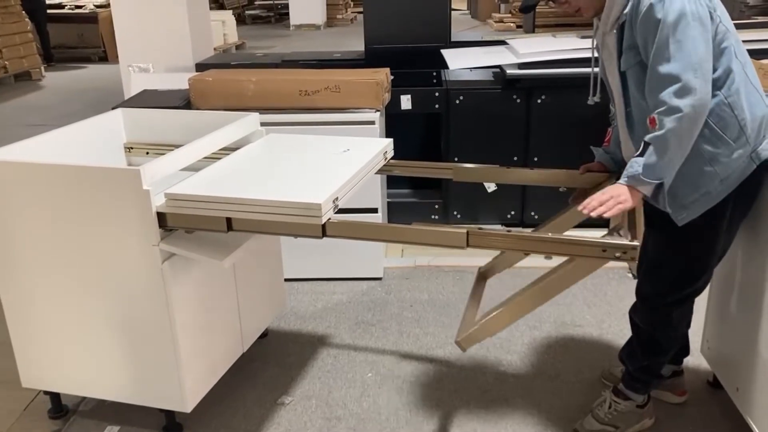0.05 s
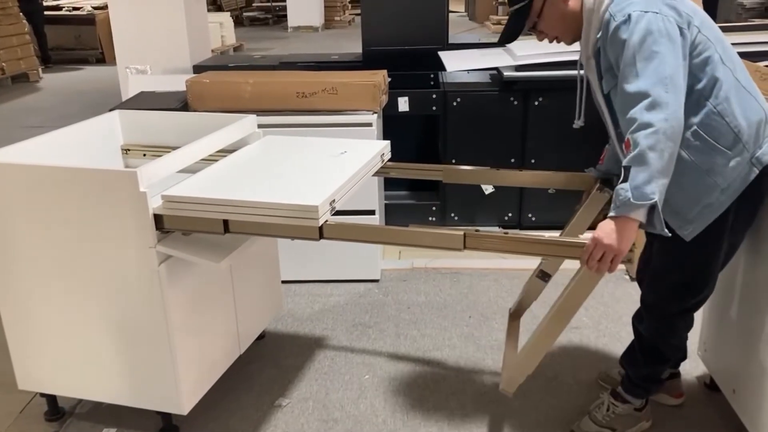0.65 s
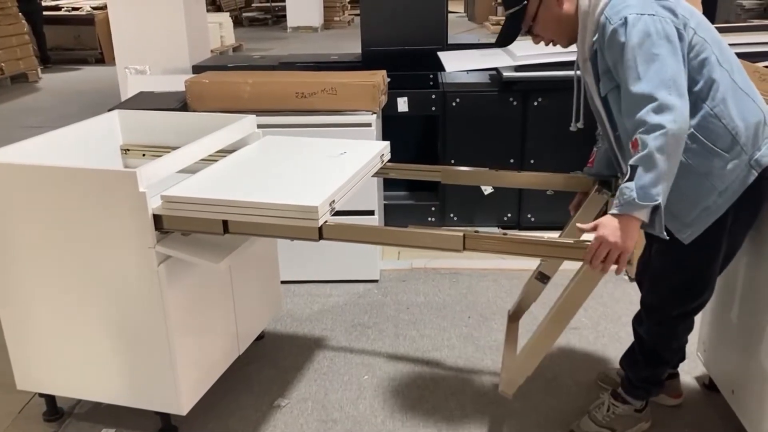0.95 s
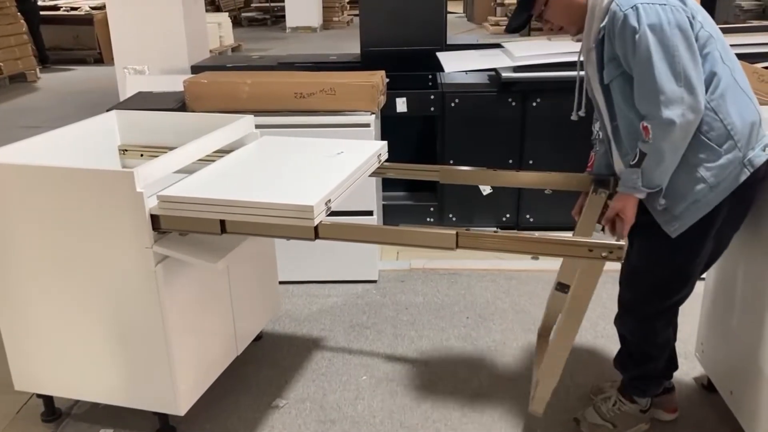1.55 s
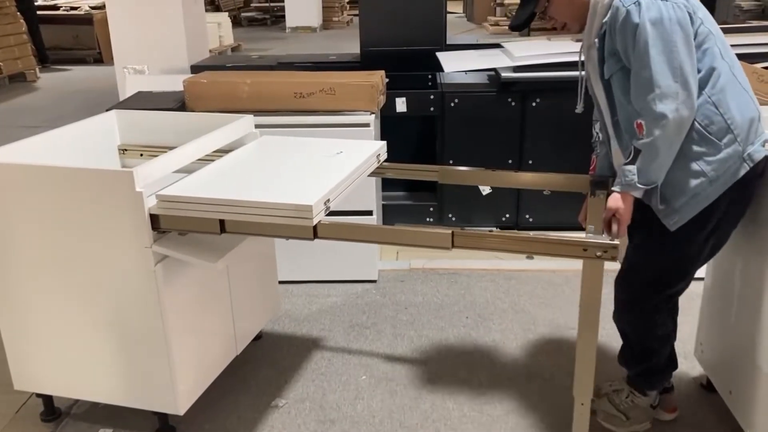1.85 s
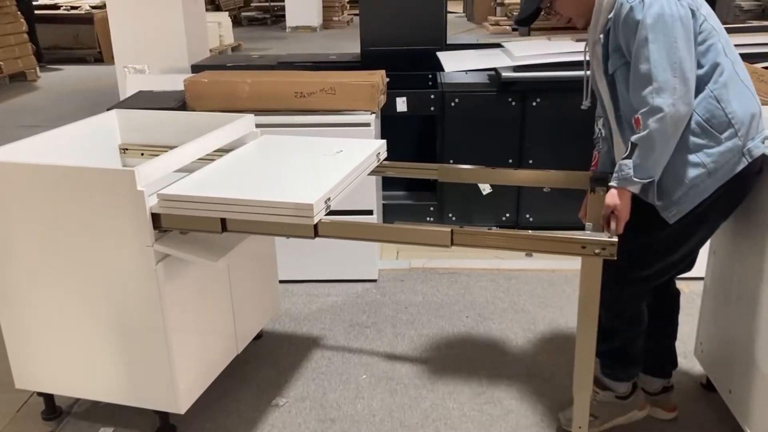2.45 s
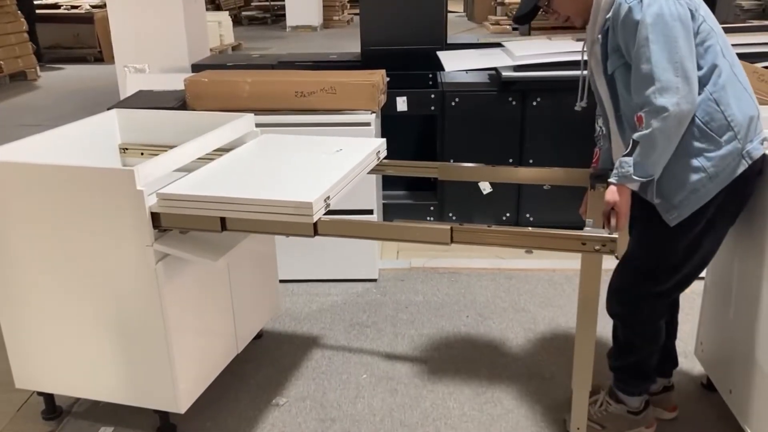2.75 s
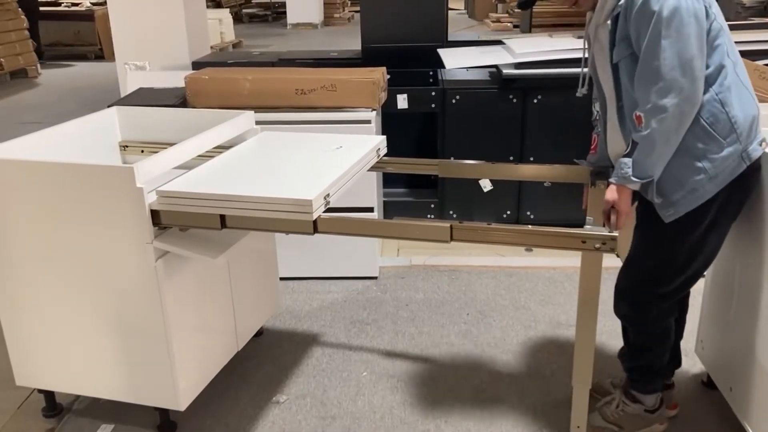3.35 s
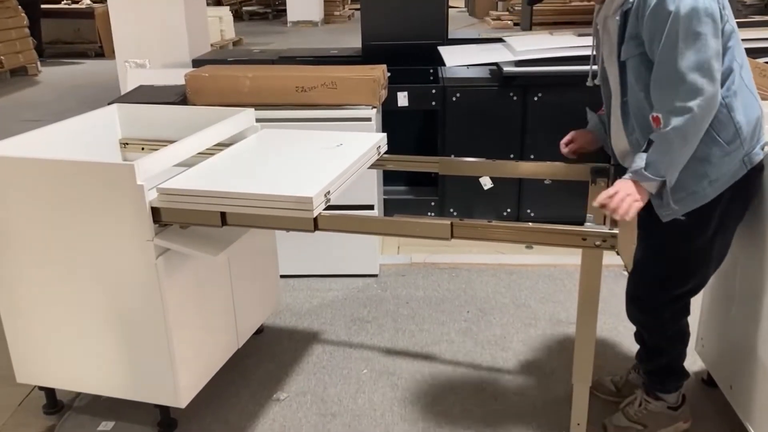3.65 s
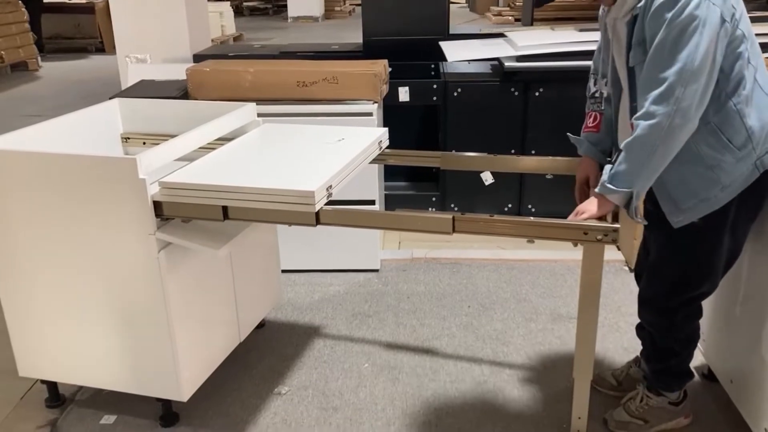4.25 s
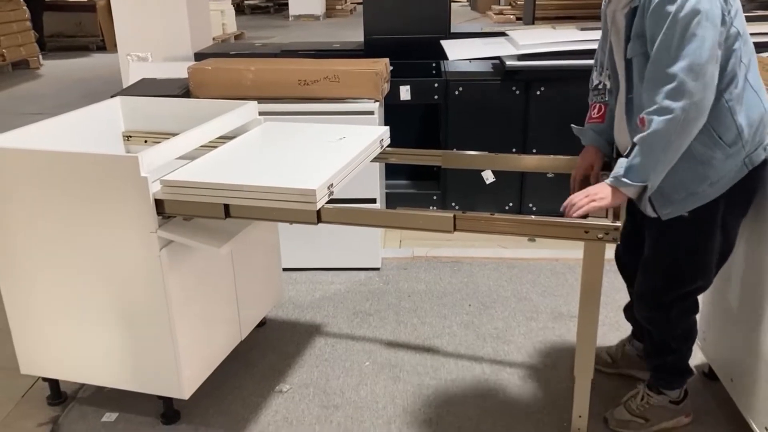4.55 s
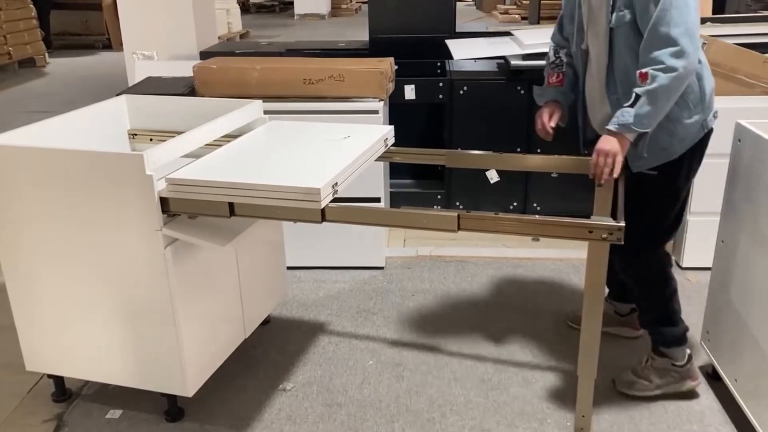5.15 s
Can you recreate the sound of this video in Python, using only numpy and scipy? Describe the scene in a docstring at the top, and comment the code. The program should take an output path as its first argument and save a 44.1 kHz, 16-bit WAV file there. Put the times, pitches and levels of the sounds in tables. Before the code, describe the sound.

A metal leg frame grinds and squeaks on stiff hinges, clacks home, then two latches snap shut in a large echoing room.

```python
"""Stiff hinges grind twice as a steel leg frame swings down from the rails of a pull-out table.
Stick-slip friction rasps, rings the tubes and booms the frame; the dry pivot squeals.
The leg clacks home, then two sprung latches snap shut and shake the rails.
Behind: ticks, bumps, a rustling jacket, warehouse ventilation and echo. A limiter ducks loud snaps."""
import sys
import numpy as np
from scipy import signal
from scipy.fft import rfft, irfft
from scipy.io import wavfile
from scipy.ndimage import uniform_filter1d, minimum_filter1d

SR = 44100
rng = np.random.default_rng(int(sys.argv[2]) if len(sys.argv) > 2 else 0)


def unload_wav(signal):
    """Save mono or channel-first audio to the path in sys.argv[1] as 16-bit WAV at rate SR, clipped to [-1, 1]."""
    wavfile.write(
        sys.argv[1],
        SR,
        np.round(np.clip(np.atleast_2d(signal).T, -1, 1) * 32767).astype(np.int16),
    )


N = 238316
TIME, FREQS = np.arange(N) / SR, np.fft.rfftfreq(N, 1 / SR)

# pushes on the hinge: t/s, level/dB, rise/s, fade/(dB/s), treble lift/dB, tube ring/dB
PUSHES = [(.888, -23, 0.019, 108, 0, -7), (1.632, -32, 0.015, 96, 1.5, 1),
          (1.66, -23.5, 0.046, 119, -17, -5.5), (1.83, -37.5, 0.023, 130, 9, -2),
          (2.04, -54, 0.02, 156, -6, 2)]
# latch contacts, one latch per rail: t/s, ring/dB, crack/dB
FIRST_CONTACTS = [(2.8033, -21, -7), (2.805, -1, -22), (2.8076, -5, -17), (2.81, -20, -12),
                  (2.8258, -14, -8.5), (2.829, -11.5, -15), (2.835, -37, -11.5)]
SECOND_CONTACTS = [(4.0262, -35, -21), (4.0303, -6.5, -27), (4.0331, -7, -3), (4.0358, -22, -9.5),
                   (4.045, -37, -14), (4.0498, -44, -21)]


def hinge(slips_per_s, grain_db, judder_db, waver, chatter_db, upright_after_s):
    """Dense stick-slip clicks rasp in the joint and pump the tube modes."""
    # rasp spectra, leg half down and nearly upright: f/Hz, level/dB
    half_down_rasp = [(200, -21), (700, -5), (1100, 0), (1500, -1), (2200, 0.5), (2600, -5.5), (3300, 0),
                      (3750, -8), (4400, -8), (5400, -11), (8000, -9.5), (10500, -15), (15500, -32)]
    upright_rasp = [(200, -8), (600, 0.5), (950, 3), (1250, -2), (1900, 3.5), (2500, -3), (3400, -3),
                    (3700, -5), (4200, -7), (4600, -16), (5700, -18), (7200, -11.5), (10500, -28),
                    (15500, -43)]
    # leg tubes: f/Hz, t60/s, half-down level/dB, upright level/dB
    tube_modes = [(1100, .33, -18, 1), (1147, .35, -20, -6), (1295, .35, -4, -9), (1341, .42, 0, 5),
                  (1365, .45, 0, -5), (1482, .4, -13, -8), (1551, .35, -15, -14), (1925, .35, -18, -14),
                  (2035, .4, -10, -14), (2140, .4, -10, -4), (2645, .4, -18, -12), (2800, .35, -10, -9),
                  (3205, .22, -3, -6), (3350, .4, -13, -10), (4050, .18, -11, -9), (4098, .22, -3, -11),
                  (4925, .2, -5, -13), (5340, .35, -15, -26), (6780, .3, -12, -24), (7005, .4, -9, -23),
                  (7510, .22, -10, -25), (7750, .18, -13, -26), (8220, .2, -17, -31)]
    out, t = np.zeros((2, N)), TIME[:SR]
    # weak rail and bracket modes: metallic grain
    crowd = sum(ring(hz, .12, t[:SR // 4], 2 * np.pi) for hz in rng.uniform(200, 15500, size=260))
    for start_s, level_db, rise_s, fade_db_per_s, lift_db, ring_db in PUSHES:
        upright = start_s > upright_after_s
        sizes = amp(grain_db * np.minimum(rng.exponential(1, (2, SR)), 3))
        sizes *= rng.choice([-1, 1], (2, SR))
        slips = evened(sizes * (rng.random((2, SR)) < slips_per_s / SR))
        envelope_db = level_db - fade_db_per_s * np.maximum(t - rise_s, 0) + judder_db * wander(70)
        slips *= np.minimum(t / rise_s, 1) * amp(envelope_db)
        tubes = np.zeros((2, SR))
        load = wander(48)  # changing joint load: each mode wavers and chatters
        for hz, t60_s, half_down_db, upright_db in tube_modes:
            pitch_hz = hz * (1 + waver * np.roll(load, rng.integers(SR)))
            carrier = np.exp(2j * np.pi * np.cumsum(pitch_hz) / SR)
            mode = carrier * signal.lfilter([1], [1, -amp(-60 / (t60_s * SR))], slips / carrier)
            chatter = amp(chatter_db * np.roll(load, rng.integers(SR)))
            tubes += amp(upright_db if upright else half_down_db) * evened(mode.real * chatter)
        dull = signal.lfilter(*signal.butter(1, 4000, fs=SR), slips)
        shelved = dull + (slips - dull) * amp(lift_db)
        grain = signal.fftconvolve(shelved, crowd / np.linalg.norm(crowd[0]), axes=1)[:, :SR]
        rasp = coloured(0.93 * shelved + 0.62 * grain, upright_rasp if upright else half_down_rasp)
        add(out, start_s, rasp + amp(ring_db) * np.std(slips) * tubes)
    return out


def pivot(roughness, waver, chirp_count, locked_s):
    """The dry pivot locks briefly onto one mode and squeals; faint random chirps until the leg locks."""
    # squeals: t/s, level/dB, length/s, f/Hz
    squeals = [(.778, -48, 0.03, 3850), (.909, -25, 0.026, 4138), (.915, -29, 0.045, 4930),
               (1.043, -34.5, .028, 4150), (1.443, -43, 0.032, 3840), (1.687, -28.5, 0.034, 4870),
               (1.69, -28.5, 0.059, 4075), (2.511, -46, 0.022, 3840), (2.783, -34, 0.036, 3940),
               (3.95, -49, 0.028, 3880)]
    chirps = [(locked_s * (k + rng.random()) / chirp_count, rng.normal(-52, 1.5), .03, 3865)
              for k in range(chirp_count)]
    out = np.zeros((2, N))
    for start_s, db, length_s, hz in squeals + chirps:
        size = round(length_s * SR)
        pitch_hz = hz * (1 + waver * wander(210)[:size])
        cycles = np.cumsum(pitch_hz) / SR + rng.uniform(0, 1 / 3, (2, 1))
        flutter = 1 + roughness * wander(150)[:size]
        add(out, start_s, amp(db) * np.hanning(size) * evened(flutter * np.sin(2 * np.pi * cycles)))
    return out


def clack():
    """The leg hits its stop and rattles to rest."""
    # impacts: t/s, level/dB, decay/s
    impacts = [(2.2126, -20.5, 0.0022), (2.2156, -13, 0.0038), (2.2223, -29, 0.0062), (2.232, -23, 0.013),
               (2.246, -43, 0.012)]
    # impact spectrum: f/Hz, level/dB
    colour = [(100, -37), (350, -4), (750, -4.5), (1200, -4), (1900, -1), (2400, -7), (4100, -3.5),
              (4900, -11.5), (6300, -14), (9200, -8.5), (12000, -14), (15500, -22)]
    out = np.zeros((2, N))
    for start_s, db, decay_s in impacts:
        add(out, start_s, amp(db) * crack(decay_s, colour))
    return out


def latch(contacts, modes, rise_s, low_cut_hz):
    """A sprung catch snaps in and bounces; each contact cracks and rings the bracket."""
    # crack spectrum: f/Hz, level/dB
    colour = [(150, -23), (500, -6), (1200, -0.5), (3000, 0), (5000, -2.5), (7300, -6), (8400, 7),
              (9500, 7.5), (11500, -2.5), (13500, -3), (15500, -12)]
    out, t = np.zeros((2, N)), TIME[:SR // 6]
    small_plate = signal.butter(3, low_cut_hz, "highpass", fs=SR, output="sos")  # radiates no bass
    attack = 1 - np.exp(-t / rise_s)
    for start_s, ring_db, crack_db in contacts:
        detune = rng.uniform(.975, 1.025, len(modes))  # each contact clamps differently
        body = sum(amp(db) * ring(hz * d, t60_s, t, 0.65) for (hz, db, t60_s), d in zip(modes, detune))
        add(out, start_s, amp(ring_db) * unit_hit(signal.sosfilt(small_plate, body * attack)))
        add(out, start_s, amp(crack_db) * crack(0.004, colour))
    return out


def latches():
    """Two catches shut in turn, each ringing its own bracket."""
    # bracket modes: f/Hz, level/dB, t60/s
    first_modes = [(1100, -8, 0.028), (2067, -4.5, 0.036), (2150, -14, 0.021), (2317, 3, 0.016),
                   (2420, 1.5, 0.021), (2760, -9.5, 0.03), (3030, -2, 0.018), (3315, -2, 0.02),
                   (3780, -13, 0.022), (4260, -17, 0.023)]
    second_modes = [(1070, -19, 0.024), (1400, -6, 0.013), (1970, -11, 0.016), (2140, 6, 0.018),
                    (2520, 0.5, 0.012), (2960, -10, .02), (3160, -4, .02), (4070, -4.5, .022),
                    (4220, -8, 0.024), (5000, -19, 0.016), (8000, -9, 0.018), (8650, 0, 0.023),
                    (10180, -2, 0.016)]
    first = latch(FIRST_CONTACTS, first_modes, rise_s=0.0012, low_cut_hz=1450)
    return first + latch(SECOND_CONTACTS, second_modes, rise_s=0.0002, low_cut_hz=930)


def rails():
    """Each latch contact shakes the crowded modes of a long rail."""
    # rail spectrum: f/Hz, level/dB
    colour = [(300, -25), (1650, -18.5), (2000, 1.5), (2500, -3), (3300, -1), (3800, -2.5), (4700, -8),
              (5400, -22), (8000, -11), (15500, -35)]
    out = np.zeros((2, N))
    for start_s, ring_db, _ in FIRST_CONTACTS + SECOND_CONTACTS:
        add(out, start_s, amp(ring_db) * crack(0.0045, colour))
    return out


def ticks():
    """Loose play clicks in the rails."""
    # clicks: t/s, level/dB, decay/s, treble lift/dB
    clicks = [(.31, -38, 0.0026, 1), (0.663, -43, 0.015, -8), (1.555, -35, 0.0086, 7.5),
              (2.577, -42.5, .004, -5), (3.351, -41.5, 0.0085, 4), (3.938, -39.5, .0066, -7),
              (3.968, -38.5, .015, -15), (4.6663, -30.5, 0.0028, 15), (4.674, -35.5, 0.0051, -13),
              (4.7176, -34, 0.0051, -2)]
    # click spectrum: f/Hz, level/dB
    colour = [(300, 1), (1500, -2), (2300, -0.5), (3300, 2.5), (4400, -1), (5600, -14.5), (8500, -8.5),
              (11000, -5.5), (15500, -44)]
    out = np.zeros((2, N))
    for start_s, db, decay_s, lift_db in clicks:
        add(out, start_s, amp(db) * crack(decay_s, colour, lift_db))
    return out


def low_sounds():
    """Dull knocks and scuffs, two brief swells of low background rumble, a frame boom under each push."""
    # low noise bursts: t/s, level/dB, centre/Hz, width/octaves, rise/s, decay/s
    bursts = [(.079, -32, 76, 1, 0.011, 0.087), (.4, -34, 195, 1, 0.046, .1),
              (.406, -34, 532, .2, .012, .05), (.658, -30.5, 365, 0.79, 0.006, 0.31),
              (.72, -41, 129, .5, 0.02, .2), (1.55, -34.5, 109, 0.67, 0.044, 0.22),
              (2.213, -27, 202, 0.87, 0.0094, .07), (3.659, -36.5, 75, 0.37, 0.014, .18),
              (4.02, -27, 264, 0.8, 0.0034, 0.22), (4.219, -33.5, 156, 0.46, 0.076, 0.16),
              (4.345, -29.5, 328, 1, 0.018, 0.1)]
    out = np.zeros((2, N))
    for start_s, db, *shape in bursts:
        add(out, start_s, amp(db) * burst(*shape))
    for start_s, db, *_ in PUSHES:
        add(out, start_s, amp(db - 12) * burst(centre_hz=215, octaves=1.16, rise_s=0.019, decay_s=0.45))
    return out


def jacket(held_db, resting_db, let_go_s, settle_s, grain_db):
    """Cloth rubs in small clumps: steadily while the frame is held, more with each arm move."""
    # arm moves: t/s, level/dB, decay/s
    swishes = [(.38, -45.5, 0.33), (.65, -38, 0.18), (1.53, -44, 0.2), (3.08, -47, 1), (3.9, -47, 0.36),
               (4.33, -48, 0.03)]
    # cloth spectrum: f/Hz, level/dB
    colour = [(300, -2.5), (900, 11.5), (1800, 1.5), (3300, -1), (5500, -9), (7500, -12.5), (11000, -11.5),
              (15500, -23)]
    power = amp(np.interp(TIME, [let_go_s, let_go_s + settle_s], [held_db, resting_db]))[None] ** 2
    for start_s, db, decay_s in swishes:
        add(power, start_s, (amp(db) * swell(0.016, decay_s))[None] ** 2)
    clumps = evened(uniform_filter1d(rng.standard_normal(N), 500))
    return noise(amp(read(colour, FREQS))) * np.sqrt(power) * amp(grain_db * clumps)


def ventilation(air_db, hiss_db):
    """Rumble of moving air, wavering fan tones, thin hiss."""
    # air spectrum: f/Hz, level/dB
    colour = [(12, -46), (20, -8.5), (65, 1.5), (92, 0), (114, -9), (195, -3.5), (266, -7.5), (301, -0.5),
              (339, -12.5), (383, -8.5), (851, -21.5), (1030, -20.5), (1760, -71), (2030, -34), (6500, -61),
              (8450, -70), (14300, -120)]
    # fan tones: f/Hz, width/Hz, level/dB
    fans = [(55.8, 8.1, -47.5), (113.2, 25, -45), (250, 19, -50), (299.5, 11.3, -45.5), (334, 5.6, -52),
            (494.5, 45, -53), (1980, 450, -59)]
    hum_power = sum((amp(db) * evened(1 / (1 + (2 * (FREQS - hz) / width_hz) ** 2))) ** 2
                    for hz, width_hz, db in fans)
    air = amp(air_db) * noise(amp(read(colour, FREQS)))
    hum = np.sqrt(hum_power.mean()) * noise(np.sqrt(hum_power))
    return air + hum + amp(hiss_db) * noise(FREQS / (FREQS + 4000))


def echoes(x, t60s, onset_s):
    """Sparse reflections of unit energy, decaying per band; t60s: f/Hz, t60/s."""
    shape = (2, 3 * SR // 2)
    taps = rng.choice([-1., 1.], shape) * (rng.random(shape) < 0.1)
    hz, t, bands = signal.stft(taps, SR, nperseg=256)
    tail = signal.istft(bands * amp(-60 * t / read(t60s, hz)[:, None]), SR, nperseg=256)[1]
    tail *= 1 - np.exp(-(TIME[:tail.shape[1]] / onset_s) ** 2)
    return signal.fftconvolve(x, tail / np.linalg.norm(tail[0]), axes=1)[:, :N]


def ring(hz, t60_s, t, spread_rad):
    """One decaying mode, up to spread_rad apart between channels."""
    phase = 2 * np.pi * rng.random() + spread_rad * rng.random((2, 1))
    return amp(-60 * t / t60_s) * np.sin(2 * np.pi * hz * t + phase)


def crack(decay_s, colour, lift_db=0, rise_s=0.0001, size=4096):
    """Hard contact: a noise burst for countless short modes dying together."""
    t = TIME[:size]
    envelope = (1 - np.exp(-t / rise_s)) * np.exp(-t / decay_s)
    return unit_hit(coloured(rng.standard_normal((2, size)) * envelope, colour, lift_db))


def burst(centre_hz, octaves, rise_s, decay_s):
    """A noise band swells and dies away."""
    hz = np.fft.rfftfreq(SR, 1 / SR) + 1
    band = (1 + (np.log2(hz / centre_hz) / octaves) ** 2 / 2) ** -2
    return swell(rise_s, decay_s) * evened(irfft(rfft(rng.standard_normal((2, SR))) * band, SR))


def swell(rise_s, decay_s):
    """Soft attack, exponential release; 1 s, peak 1."""
    t = TIME[:SR]
    shape = (1 - np.exp(-t / rise_s)) ** 2 * np.exp(-t / decay_s)
    return shape / shape.max()


def wander(rate_hz):
    """Smooth random motion; 1 s, rms 1."""
    hz = np.fft.rfftfreq(SR, 1 / SR)
    return evened(irfft(rfft(rng.standard_normal(SR)) * np.exp(-(hz / rate_hz) ** 2), SR))


def noise(gain):
    """Stereo noise of the given spectrum, rms 1."""
    return evened(irfft(rfft(rng.standard_normal((2, N))) * gain, N))


def coloured(x, colour, lift_db=0, size=2048):
    """Causal unit-energy filter with a treble shelf at 6 kHz."""
    hz = abs(np.fft.fftfreq(size, 1 / SR))
    treble = hz ** 4 / (hz ** 4 + 6000. ** 4)
    log_gain = np.log(amp(read(colour, hz) + lift_db * treble))
    taps = np.fft.ifft(np.exp(np.conj(signal.hilbert(log_gain)))).real  # minimum phase
    return signal.fftconvolve(x, taps[None] / np.linalg.norm(taps), axes=1)[:, :x.shape[1]]


def amp(db):
    """dB to gain."""
    return 10 ** (np.asarray(db) / 20)


def evened(x):
    """Scale to rms 1."""
    return x / np.sqrt(np.mean(x ** 2) + 1e-20)


def unit_hit(x):
    """Scale each channel to the energy of 5 ms at rms 1."""
    return x / np.sqrt(np.sum(x ** 2, -1, keepdims=True) / (.005 * SR) + 1e-20)


def read(points, hz):
    """Interpolate a table over log frequency."""
    f, value = np.transpose(points)
    return np.interp(np.log(hz + 1), np.log(f + 1), value)


def pan(balance):
    """Left and right gain spectra from a level-difference table."""
    return amp(read(balance, FREQS) * np.array([[.5], [-.5]]))


def add(mix, start_s, sound):
    """Mix a sound in at start_s."""
    part = mix[:, round(start_s * SR):][:, :sound.shape[1]]
    part += sound[:, :part.shape[1]]


def limiter(x, ceiling_db, hold_s, recover_db_per_s):
    """Gain drops at once on a loud snap, holds, recovers."""
    power_db = 10 * np.log10(abs(uniform_filter1d((x ** 2).mean(0), 300)) + 1e-12)
    over_db = np.maximum(power_db - ceiling_db, 0)
    half = round(hold_s * SR / 2)
    held_db = -minimum_filter1d(-over_db, 2 * half + 1, origin=half)
    ramp_db = TIME * recover_db_per_s
    cut_db = np.maximum.accumulate(held_db + ramp_db) - ramp_db
    return x * amp(-uniform_filter1d(cut_db, 100))


def scene():
    """Direct sound, scatter off floor and cabinets, hall tail, background."""
    # balance of near hits: f/Hz, left minus right/dB
    near_balance = [(200, -20), (700, 0), (2200, 10.5), (3300, 7), (4400, 1), (7000, -7), (16000, -10.5)]
    # hall decay: f/Hz, t60/s
    hall_t60s = [(150, 1.9), (1200, 1.18), (2800, 1.003), (5000, 0.95), (8000, 0.44), (15000, 0.36)]
    grind = hinge(slips_per_s=2300, grain_db=2.5, judder_db=1.5, waver=0.0052, chatter_db=5,
                  upright_after_s=1.5)
    grind += pivot(roughness=0.38, waver=0.0049, chirp_count=11, locked_s=2.8)
    snaps, knock, clicks = latches(), clack(), ticks()
    direct = irfft(rfft(snaps + knock + clicks) * pan(near_balance), N) + amp(-2.5) * grind
    to_scatter = amp(-9.5) * snaps + amp(-5.5) * knock + amp(-5) * clicks + amp(-8) * grind
    scatter = echoes(to_scatter, t60s=[(500, 0.084), (3000, 0.23), (12000, 0.07)], onset_s=0.007)
    to_hall = amp(-15.5) * (snaps + rails()) + amp(-12.5) * knock + amp(-10.5) * clicks + amp(-10) * grind
    hall = echoes(to_hall, hall_t60s, onset_s=0.029)
    behind = low_sounds() + jacket(held_db=-47, resting_db=-52, let_go_s=4.14, settle_s=0.64, grain_db=1)
    return direct + scatter + hall + behind + ventilation(air_db=-35, hiss_db=-63)


def record(dry):
    """Low cut, two close microphone ports sharing bass and top treble, limiter, clipping, band limit."""
    # port likeness: f/Hz, left-right correlation
    likeness = [(40, 1), (130, 0.93), (300, 0.82), (500, 0), (900, 0.12), (6200, 0), (7100, 1),
                (8000, 0.83), (8700, 1), (10300, 1), (11400, 1), (12500, 0.97), (13600, 1), (15500, 0.82)]
    # right port delay: f/Hz, lag/rad
    lag = [(0, 0), (7300, 0), (8600, 3.0), (9600, 3.3), (10900, 6.2), (12100, 6.4), (13100, 9.3),
           (14300, 9.6), (15200, 12.5)]
    # port balance: f/Hz, left minus right/dB
    balance = [(50, -2), (130, 0.4), (320, 1.3), (700, 2.4), (1300, 1.5), (2600, 0.7), (5000, -1),
               (14000, -1.7)]
    low_cut_hz, high_cut_hz = 33, 16200
    left, right = rfft(dry) * FREQS ** 4 / (FREQS ** 4 + low_cut_hz ** 4)
    shared = np.clip(read(likeness, FREQS), 0, .985)
    right = (shared * left + np.sqrt(1 - shared ** 2) * right) * np.exp(-1j * read(lag, FREQS))
    ports = irfft(np.array([left, right]) * pan(balance), N)
    limited = limiter(ports, ceiling_db=-10.5, hold_s=0.11, recover_db_per_s=73)
    lowpass = signal.firwin(301, high_cut_hz, window=("kaiser", 9), fs=SR)
    return signal.oaconvolve(np.clip(limited, -1, 1), lowpass[None], "same")


dry = scene()
out = record(dry)
unload_wav(out)
```